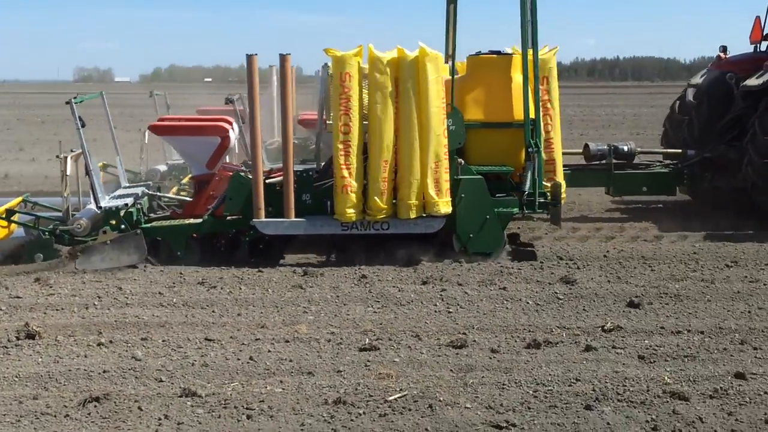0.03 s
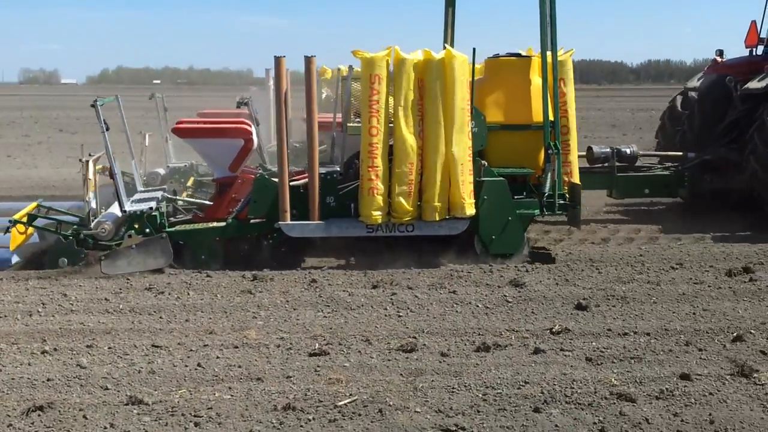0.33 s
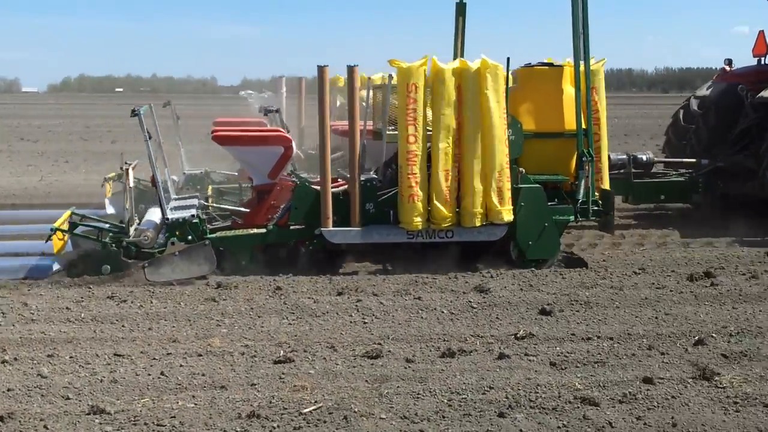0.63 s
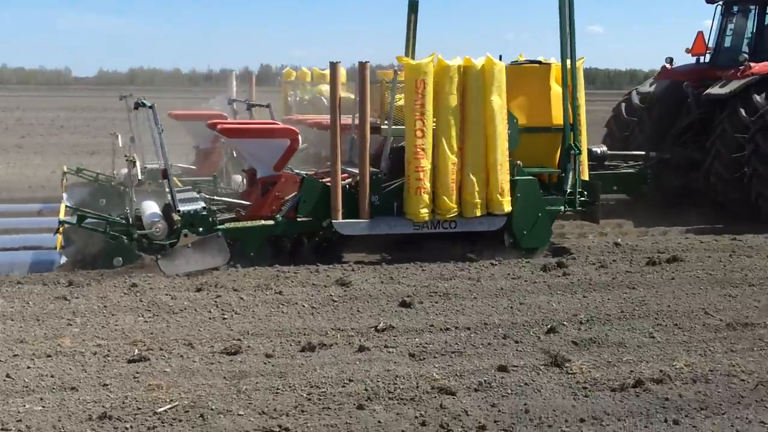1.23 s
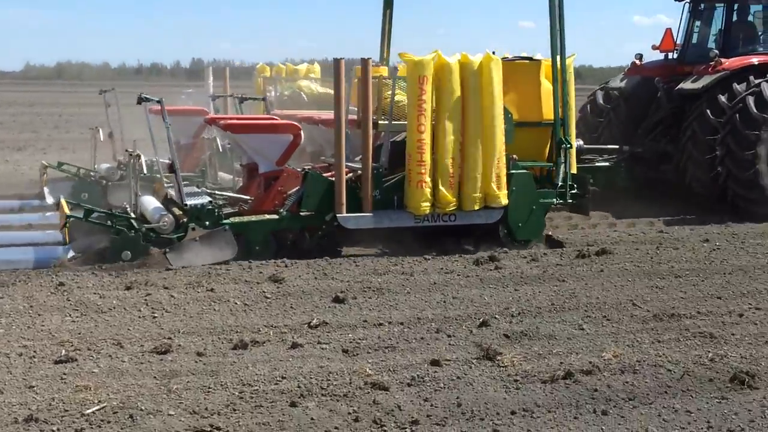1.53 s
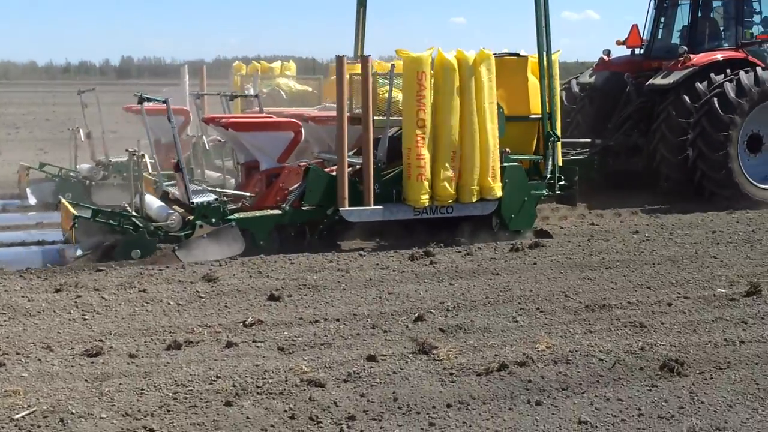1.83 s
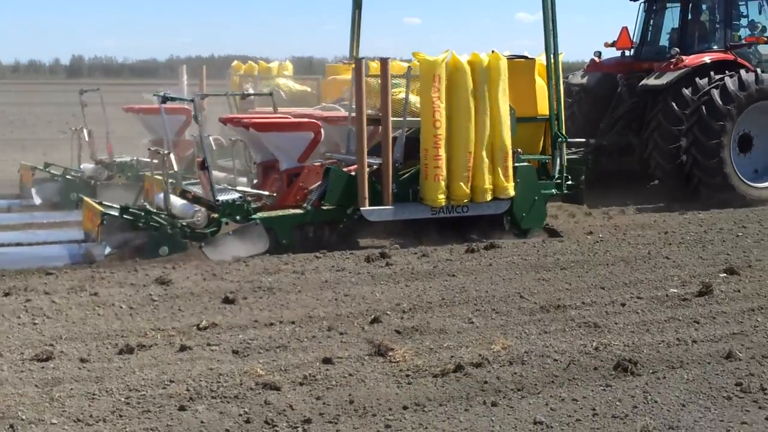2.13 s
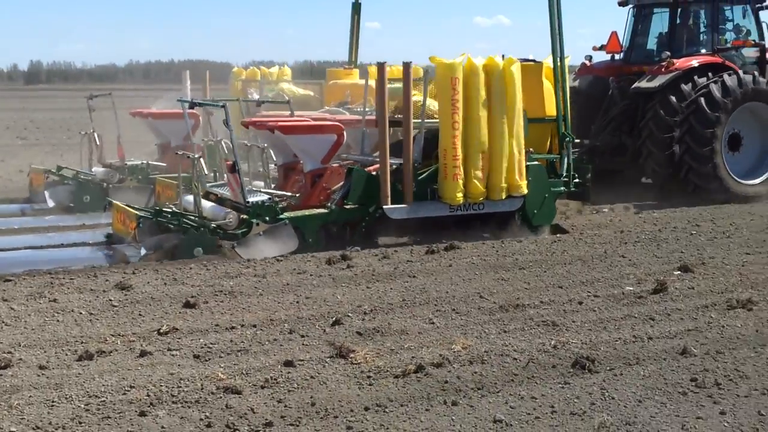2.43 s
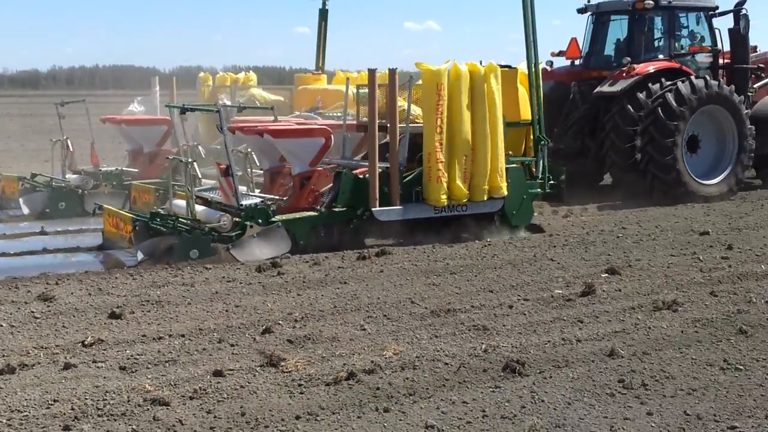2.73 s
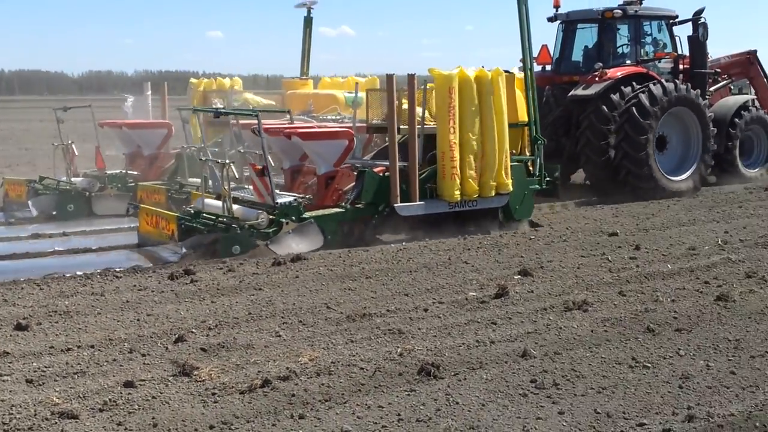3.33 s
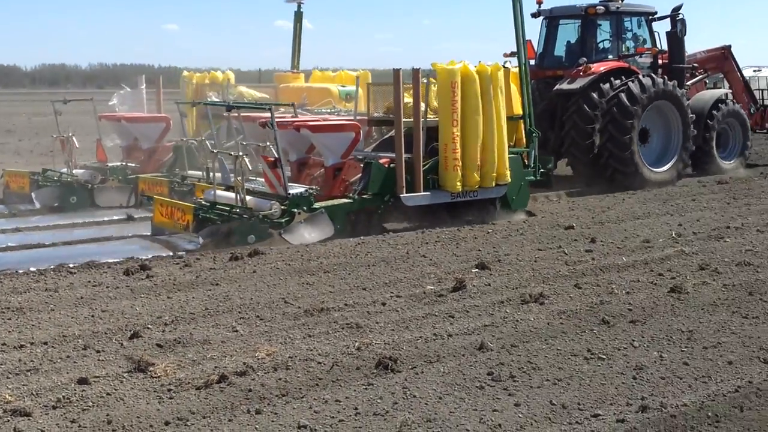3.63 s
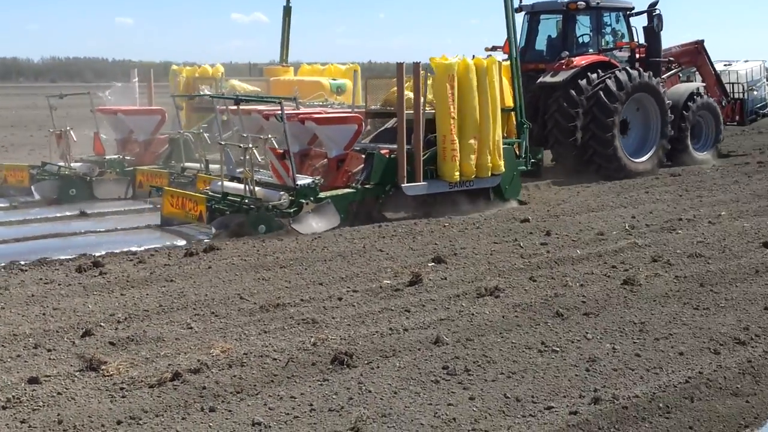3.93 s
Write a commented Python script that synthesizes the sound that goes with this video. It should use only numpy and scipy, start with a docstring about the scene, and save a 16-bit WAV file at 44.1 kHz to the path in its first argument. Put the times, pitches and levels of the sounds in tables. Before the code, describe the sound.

Gusts of wind rumble and thump right on the microphone, growing stronger until they overload it and crackle. Farther off in the open field, a tractor drones and whines, its planter hissing steadily and clunking once near the start.

```python
"""An open field, heard from a camera's two-port microphone standing in the wind. From the start a diesel
tractor draws a planter slowly away: firing drone, pump whine, ringing machinery and the hiss of the
planter's air system, with gusts buffeting the ports close up. About half a second in, one clunk rings.
In the second half the gusts hit harder and overload the microphone into a tearing crackle."""
import sys
import numpy as np
from scipy import signal
from scipy.fft import rfft, irfft
from scipy.io import wavfile
from scipy.ndimage import uniform_filter1d, map_coordinates

SR = 44100
rng = np.random.default_rng(int(sys.argv[2]) if len(sys.argv) > 2 else 0)


def output_pcm(signal):
    """Save a mono or channel-first signal as 16-bit PCM at the path in sys.argv[1].

    Samples are clipped to [-1, 1] before scaling.
    """
    pcm = np.clip(np.atleast_2d(signal).T, -1, 1) * 32767
    wavfile.write(sys.argv[1], SR, np.round(pcm).astype(np.int16))


N = 176400


def undb(db):
    """Decibels to gain."""
    return 10 ** (np.asarray(db) / 20)


def curve(rows):
    """Rows of time_s, value joined by straight lines."""
    return np.interp(np.arange(N) / SR, *np.array(rows).T)


def walk(hz):
    """Smooth random drift, hz new levels a second; spread near 1."""
    hold = int(SR / hz)
    steps = rng.standard_normal(2048)[np.arange(N) // hold % 2048]
    return 1.527 * uniform_filter1d(uniform_filter1d(steps, hold), hold)


def shaped(gain):
    """Noise of rms 1 with the given gain in each frequency bin."""
    x = irfft(rfft(rng.standard_normal(N)) * gain, N)
    return x / x.std()


def noise(spectrum):
    """Noise of rms 1 shaped by rows of freq_hz, level_db."""
    hz, db = np.array(spectrum).T
    freqs = np.maximum(np.fft.rfftfreq(N, 1 / SR), 1)
    return shaped(undb(np.interp(np.log(freqs), np.log(hz), db)))


# Engine and pump tones out in the field: firing_multiple, level_db
ENGINE_ORDERS = [(1, -29), (2, -27.5), (3, -35), (5, -45), (10, -37.5), (15, -43.5), (20, -39)]
# Gear whine: pitch_hz, level_db
GEAR_TONES = [(880, -49), (969, -40.5), (2040, -49), (2503, -51)]
# Ringing machinery: freq_hz, level_db
CLATTER_SPECTRUM = [(60, 13.5), (150, 3.5), (400, 0.5), (650, -4.5), (930, 0), (1100, -11), (1350, -6.5),
                    (1650, -6), (2000, -11), (2180, -18.5), (2500, -16.5), (3000, -17.5), (4500, -25.5),
                    (9000, -108)]

def tractor(t):
    """Moving off across the field: tones on one shaft speed, over clatter that pulses with the firings."""
    firing_hz, speed_wander, knock_depth = 79.5, 0.001997, 0.28
    shaft = 2 * np.pi * np.cumsum(1 + speed_wander * walk(5)) / SR
    tones = [(firing_hz * multiple, db) for multiple, db in ENGINE_ORDERS] + GEAR_TONES
    drone = 0
    for hz, db in tones:
        amplitude = np.sqrt(2) * undb(db + 1.5 * walk(11.84))
        drone += amplitude * np.sin(hz * shaft + 2 * np.pi * rng.random())
    clatter = noise(CLATTER_SPECTRUM) * (1 + knock_depth * np.cos(firing_hz * shaft))
    return drone * undb(-1.1 - t) + clatter * undb(-21.5 - 0.4 * t)  # both fade with distance


# Air rushing through the planter: freq_hz, level_db
AIR_SPECTRUM = [(1500, -6), (3000, -6), (4500, -3), (5500, -1), (6200, 1), (7100, -0.5), (7900, -2.5),
                (8800, -6), (9350, -7), (10100, -15), (11000, -59)]
# Its nearly steady hiss at the microphone: time_s, level_db
HISS_LEVEL = [(0, -37), (1, -36), (2, -36), (3, -37), (4, -36.5)]
# Resonances of the air system: centre_hz, width_hz, level_db
DUCT_MODES = [(2480,220,-1),(3200,130,-7),(3740,160,-2.5),(4340,140,-8),(4540,120,-8),(5030,140,-5),(5950,200,-2),(6570,130,-1),(6900,380,1),(7330,190,3.5)]

def planter(t):
    """Air hisses through the seed units; the ducts' ring wavers and fades as the planter turns its back."""
    freqs = np.fft.rfftfreq(N, 1 / SR)
    power = sum((undb(db) / (1 + (2 * (freqs - hz) / width) ** 2)) ** 2 for hz, width, db in DUCT_MODES)
    ducts = shaped(np.sqrt(power))
    wavering_index = np.cumsum(1 + 0.003 * walk(12))
    ducts = map_coordinates(ducts, [wavering_index], mode="mirror")
    air = noise(AIR_SPECTRUM) * undb(curve(HISS_LEVEL))
    flutter = undb(0.76 * walk(25.7))
    return (air + ducts * undb(-34.5 - 4.5 * t)) * flutter


# Ring of the clunk: pitch_hz, level_db
CLUNK_RING = [(680, -10), (1010, 1.5), (1230, -2.5)]

def clunk(t, start_s=0.464, level_db=-16.5, decay_s=0.01):
    """Out at the machines a hard knock, probably in the planter's frame, rings briefly."""
    age = np.maximum(t - start_s, 0)
    ring = sum(undb(db) * np.sin(2 * np.pi * hz * age) for hz, db in CLUNK_RING)
    return undb(level_db) * np.exp(-age / decay_s) * ring


def turbulence(spectrum, shared=0.78, eddy_hz=135.2, throb_db=3):
    """Rough air right at the two ports, partly shared, throbbing with small eddies."""
    common = np.sqrt(shared) * noise(spectrum)
    throb = undb(throb_db * walk(eddy_hz))
    return throb * np.array([common + np.sqrt(1 - shared) * noise(spectrum) for _ in range(2)])


# Gusts at the microphone: time_s, strength_db
GUST_STRENGTH = [(0,-18.5),(.06,-31),(.085,-28),(.11,-21.5),(.22,-28),(.27,-22.5),(.325,-12),(.345,-35),(.38,-23),(.41,-24),(.455,-23),(.475,-12),(.49,-21.5),(.515,-21),(.54,-32),(.64,-20.5),(.66,-20),(.705,-19.5),(.725,-34),(.83,-28.5),(.865,-55),(.915,-19.5),(.945,-53),(.985,-12.5),(1.02,-51),(1.1,-24),(1.14,-18),(1.175,-31),(1.205,-17.5),(1.24,-29.5),(1.28,-18.5),(1.32,-28),(1.39,-17.5),(1.41,-36),(1.435,-17),(1.455,-24),(1.49,-20),(1.58,-22.5),(1.62,-27.5),(1.74,-28.5),(1.77,-22),(1.805,-18),(1.83,-31),(1.92,-30.5),(1.955,-21),(1.99,-33),(2.03,-17.5),(2.06,-15),(2.1,-44),(2.14,-14),(2.185,-22.5),(2.22,-12.5),(2.245,-21),(2.27,-16),(2.295,-18),(2.335,-18.5),(2.37,-21),(2.405,-29),(2.425,-16),(2.44,-25),(2.47,-13.5),(2.52,-14),(2.55,-27),(2.575,-22),(2.6,-25),(2.635,-23.5),(2.69,-9),(2.77,-9.5),(2.86,-10),(2.93,-18.5),(2.99,-17),(3.04,-9.5),(3.13,-6.5),(3.155,-12),(3.18,-20.5),(3.235,-29),(3.26,-8),(3.295,-19.5),(3.315,-16),(3.355,-16),(3.395,-21),(3.44,-15),(3.475,-11),(3.495,-21.5),(3.53,-10.5),(3.555,-11),(3.63,-9),(3.68,-7.5),(3.76,-10),(3.92,-6),(4,-8)]
# Slow eddies round the camera: time_s, level_db
RUMBLE_LEVEL = [(0,-18.5),(.08,-10.5),(.16,-28),(.24,-25),(.33,-24),(.38,-18.5),(.5,-25),(.54,-12),(.6,-25),(.75,-22),(.82,-25),(.85,-20),(.91,-22),(.97,-22),(1.02,-33),(1.08,-28),(1.13,-22),(1.29,-17.5),(1.35,-12.5),(1.38,-35),(1.44,-9),(1.5,-22),(1.55,-17),(1.61,-26),(1.68,-25),(1.73,-30),(1.81,-11),(1.86,-28),(1.93,-19.5),(1.99,-31),(2.1,-19),(2.28,-19),(2.41,-19),(2.52,-4.5),(2.56,-24),(2.62,-20),(2.7,-24),(2.92,-15),(2.96,-33),(3.09,-10.5),(3.22,-16.5),(3.36,-18),(3.44,-22),(3.49,-9),(3.55,-19),(3.83,-20.5),(3.96,-10),(4,-9)]
# Spectra of large, middling and small eddies: freq_hz, level_db
RUMBLE_SPECTRUM = [(12, -21), (25, -2.5), (45, -4.5), (80, 3.5), (130, 2.5), (200, -1), (320, -14),
                   (700, -21.5), (2000, -101)]
BUFFET_SPECTRUM = [(40, -24), (100, -3), (170, -2.5), (280, -0.5), (420, -6.5), (700, -15), (1200, -25.5),
                   (2500, -66), (6000, -80.5)]
TEARING_SPECTRUM = [(120, -16), (300, -0.5), (500, 2), (800, -4), (1300, -15.5), (2200, -25.5),
                    (4000, -41.5), (9000, -68)]

def wind():
    """On the microphone, large eddies rumble; smaller, brighter ones grow faster with each gust."""
    gust_db = curve(GUST_STRENGTH) + 20  # relative to a middling gust
    rumble = turbulence(RUMBLE_SPECTRUM) * undb(2 + curve(RUMBLE_LEVEL))
    buffet = turbulence(BUFFET_SPECTRUM) * undb(-14 + 0.99 * gust_db)
    tearing = turbulence(TEARING_SPECTRUM) * undb(-24.5 + 1.27 * gust_db)
    return rumble + buffet + tearing


# Single eddies hitting the ports: start_s, strength_db, centre_hz, decay_s
EDDY_SLAPS = [(0.086,-0.5,440,0.016),(.297,-7,900,.005),(0.305,-10,1100,0.0049),(.325,-7.5,1000,0.0028),(.463,-2,1120,0.0068),(.502,-4,900,0.0034),(0.517,-5.5,1000,0.0043),(0.555,-12,804,0.0033),(.693,-12,710,0.013),(1.133,-13,1010,.0041),(1.192,-9,650,0.0084),(1.255,-13,653,.0084),(1.422,-1,500,0.009),(1.463,-14,700,0.0047),(1.795,-15,553,.0048),(2.195,-2.5,644,0.0056),(2.215,-6,700,0.0046),(2.228,-12,700,0.0036),(2.265,-3,950,.006),(2.307,-13,796,.003),(2.354,-4,1200,0.0035),(2.362,-9,1100,0.0083),(2.383,-5,900,0.0027),(2.431,3,1100,0.0042),(2.448,-14,900,0.0026),(2.613,-12,700,0.003),(2.644,-4,920,0.0044),(2.763,7,1100,.0037),(3.013,-2.5,795,0.0029),(3.033,5,704,0.0083),(3.044,-10,1500,.005),(3.06,3,2420,0.0032),(3.097,-7.5,1400,0.0036),(3.128,-10,1400,0.0062),(3.25,-8,1020,.0041),(3.372,-6,1000,.0027),(3.505,-1,800,0.0031),(3.635,-3,1010,.0049),(3.976,0.5,850,.0063)]
# Spectrum of one slap: centre_multiple, level_db
SLAP_SPECTRUM = [(.15, 4.5), (.5, -0.5), (1, -4), (1.5, -18), (3, -29), (6, -31), (12, -68)]

def slaps(t, attack_s=0.00047, gain_db=2):
    """Single eddies strike both ports at once and die within milliseconds, each ringing at its own pitch."""
    out = 0
    for start, db, centre_hz, decay in EDDY_SLAPS:
        force = np.clip((t - start) / attack_s, 0, 1) * np.exp(-np.abs(t - start) / decay)
        swirl = noise([(multiple * centre_hz, level) for multiple, level in SLAP_SPECTRUM])
        local_rms = np.sqrt(uniform_filter1d(swirl ** 2, size=200))
        out += undb(db + gain_db) * force * swirl / local_rms
    return out


def lulls(t, dip_db=-1.5, lull_s=0.0085):
    """Gain of the wind: it slackens for a moment ahead of each slap."""
    corners_s = lull_s * np.array([-2, -0.5, 0, 0.5])
    slack = sum(np.interp(t, start + corners_s, [0, 1, 1, 0]) for start, *_ in EDDY_SLAPS)
    return undb(dip_db * np.minimum(slack, 1))


# Sharp cracks at the ports: start_s, level_db
PRESSURE_STEPS = [(.327,-11),(0.465,-13),(2.28,-5),(2.435,0),(2.491,-12),(2.689,-2),(2.765,-5),(2.805,-4),(2.883,1),(3.012,2),(3.091,8),(3.108,4),(3.114,-2),(3.274,-5),(3.375,-1),(3.632,-7),(3.65,-7),(3.693,-0.5),(3.727,-5),(3.908,-1)]

def snaps(t, leak_s=0.0007):
    """Abrupt pressure steps of either sign that leak away at once: the sharpest cracks."""
    out = 0
    for start, db in PRESSURE_STEPS:
        step = np.interp(t, [start - 1 / SR, start, start + leak_s], [0, 1, 0])
        out += rng.choice([-1, 1]) * undb(db) * step
    return out


# How abruptly the flow breaks at the ports: time_s, steepening_db
FRONT_STEEPNESS = [(0,-31),(2.2,-13.5),(2.25,-3),(2.265,-1),(2.29,-16),(2.34,-16),(2.36,-8),(2.39,-18),(2.62,-15),(2.69,-1),(2.77,2),(2.86,3),(2.91,-16),(3.02,-5),(3.05,14),(3.125,1),(3.145,-11),(3.23,-16),(3.255,1),(3.3,6),(3.34,9),(3.39,-16),(3.44,-12),(3.475,17),(3.5,-22),(3.58,-8),(3.635,-3),(3.665,1),(3.7,2),(3.76,-1),(3.85,-8),(3.92,3),(4,-7)]

def overload(ports, plateau=0.37, knee=3.05, crackle_hz=260.5, release_s=0.011):
    """Wind pressure flattens into plateaus that sag under load; their steep, uneven fronts crackle."""
    steep_db = curve(FRONT_STEEPNESS)
    driven = ports * (1 + undb(steep_db + 2.5 * walk(crackle_hz)))
    flattened = driven / (1 + np.abs(driven / plateau) ** knee) ** (1 / knee)
    pole = np.exp(-1 / (release_s * SR))
    load = signal.lfilter([1 - pole], [1, -pole], np.abs(ports) * (1 + undb(steep_db)))
    sag = np.maximum(load / 0.63, 1) ** -0.097
    unevenness = undb(2 * walk(crackle_hz))
    return flattened * sag * unevenness


def microphone(ports, coupling_hz=40, preamp_db=1.5, rail=0.62):
    """Each capsule loses its deepest bass and clips at the rail; the two are averaged to mono."""
    coupled = signal.lfilter(*signal.butter(1, coupling_hz, "high", fs=SR), ports)
    return np.clip(undb(preamp_db) * coupled, -rail, rail).mean(axis=0, keepdims=True)


def scene():
    """The machines out in the field and the wind on the ports meet at the microphone."""
    t = np.arange(N) / SR
    buffeting = overload(wind() * lulls(t) + slaps(t)) + snaps(t)
    rounded = signal.lfilter(*signal.butter(2, 5500, fs=SR), buffeting)  # softens the cracks' edges
    return microphone(tractor(t) + planter(t) + clunk(t) + rounded)


def record(dry):
    """The recorder cuts the treble above 11.8 kHz."""
    return signal.sosfilt(signal.ellip(8, .2, 70, 11800, fs=SR, output="sos"), dry)


dry = scene()
out = record(dry)
output_pcm(out)
```